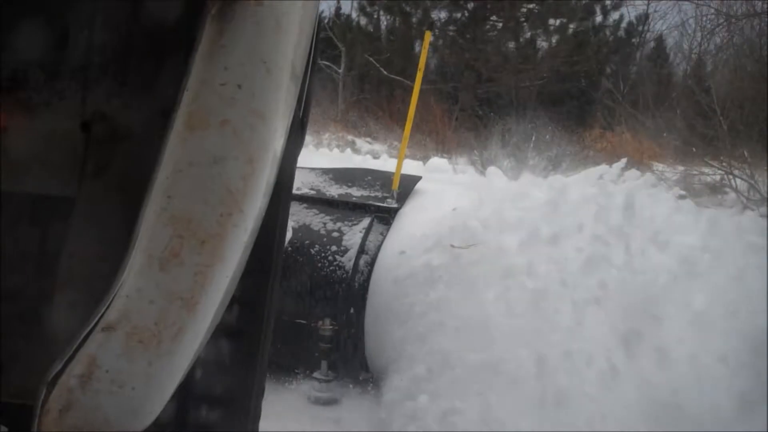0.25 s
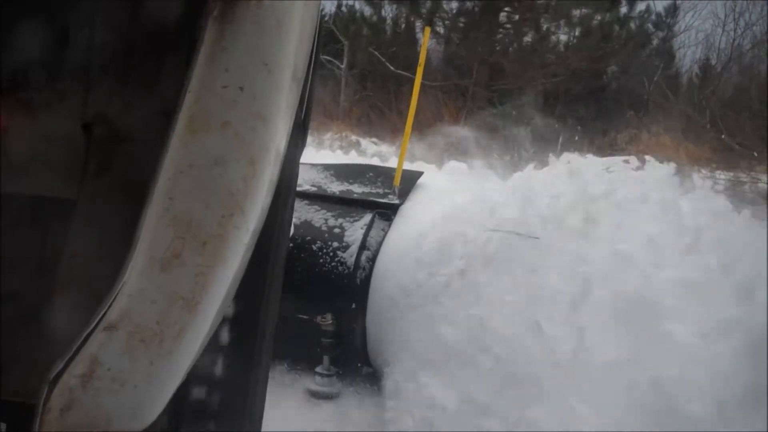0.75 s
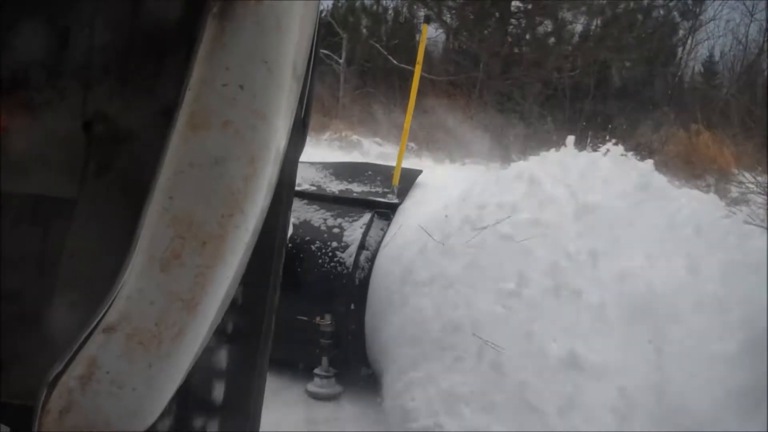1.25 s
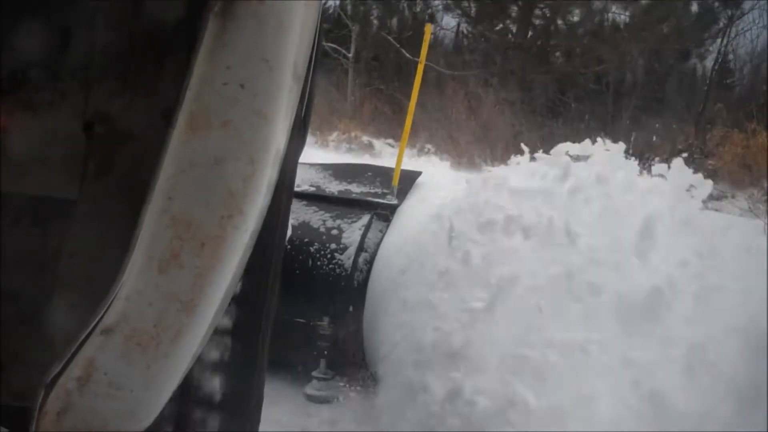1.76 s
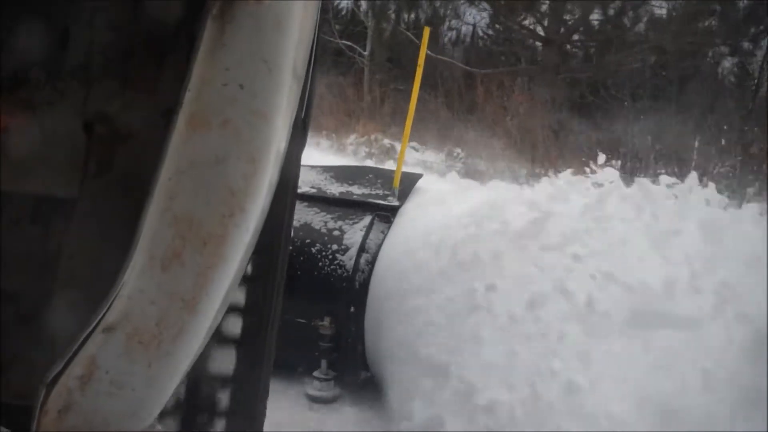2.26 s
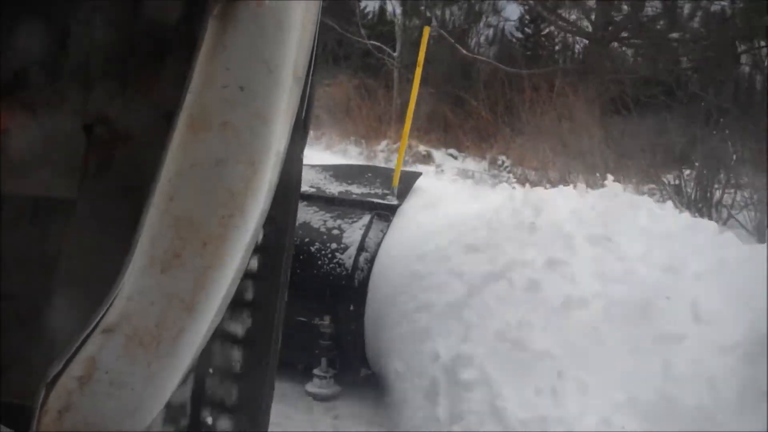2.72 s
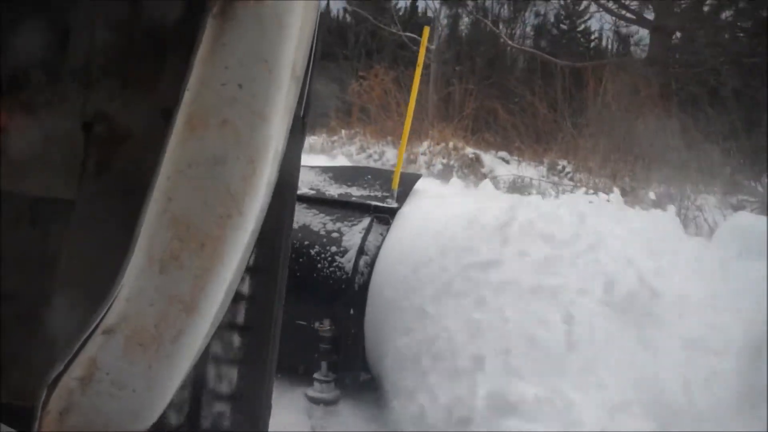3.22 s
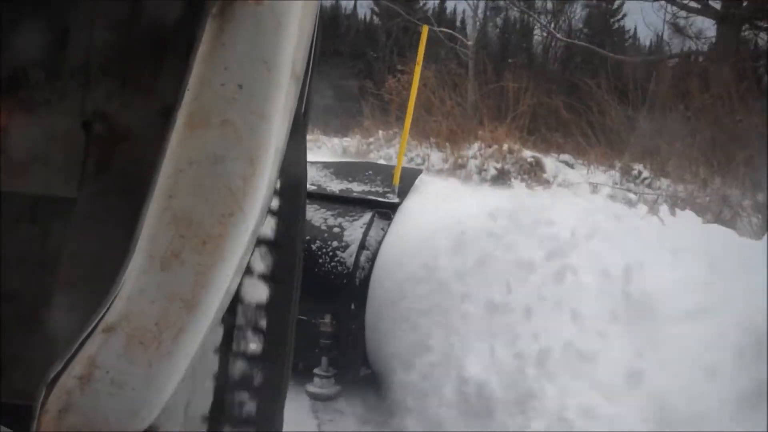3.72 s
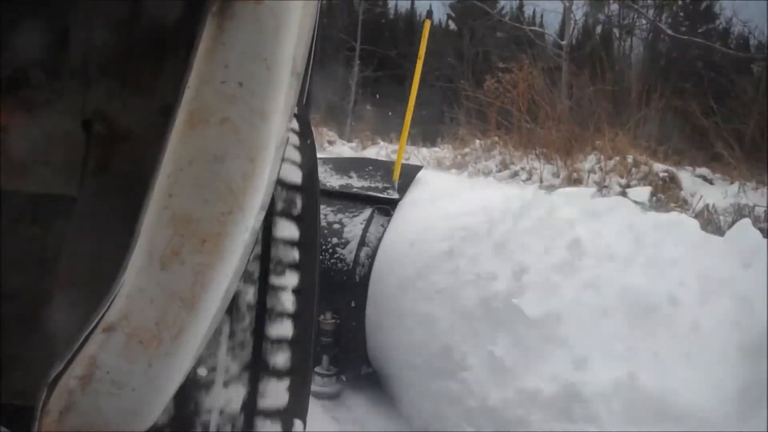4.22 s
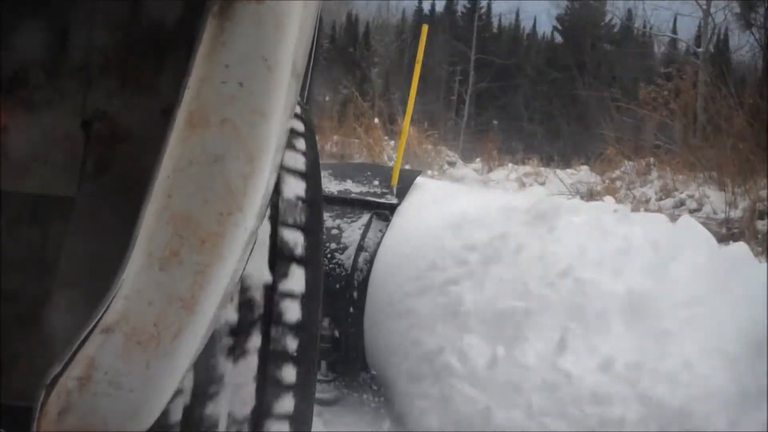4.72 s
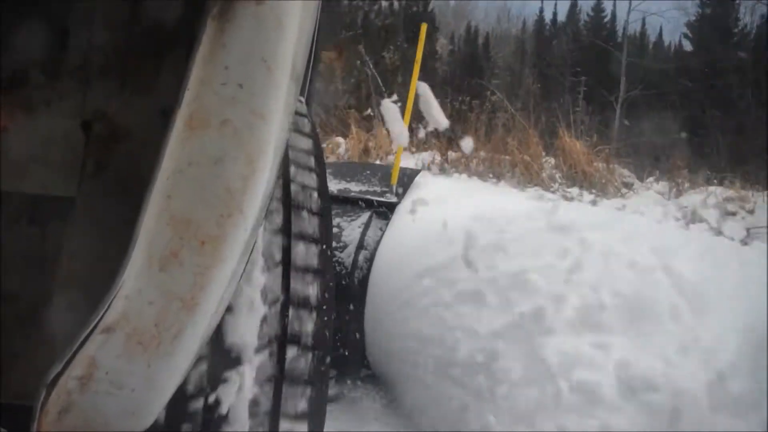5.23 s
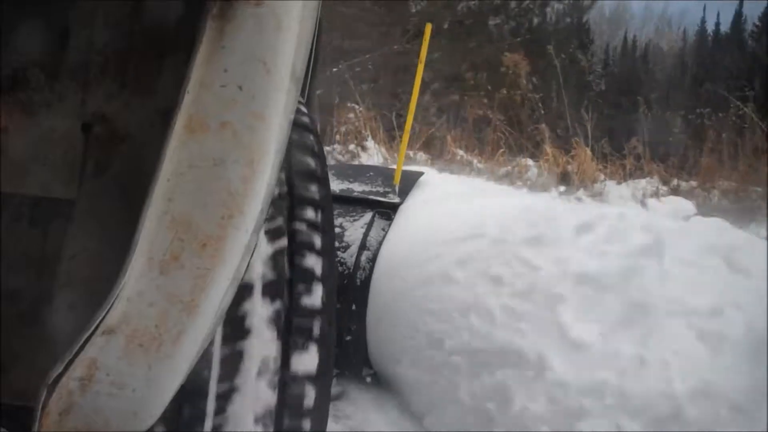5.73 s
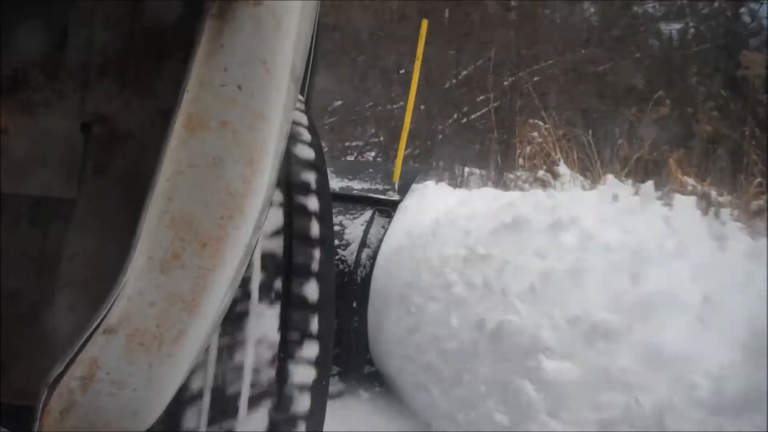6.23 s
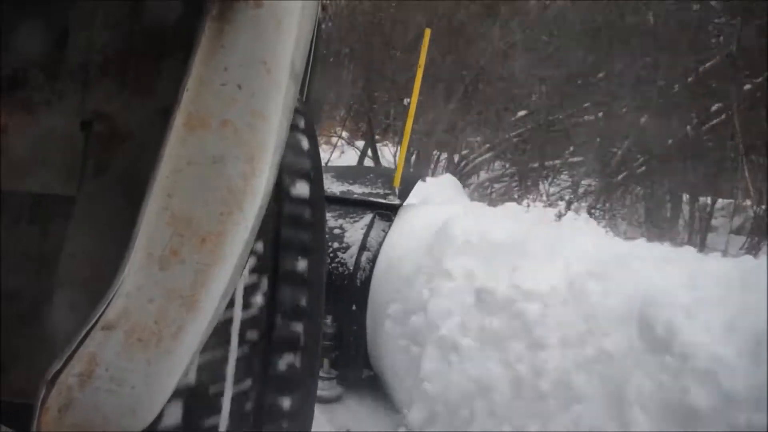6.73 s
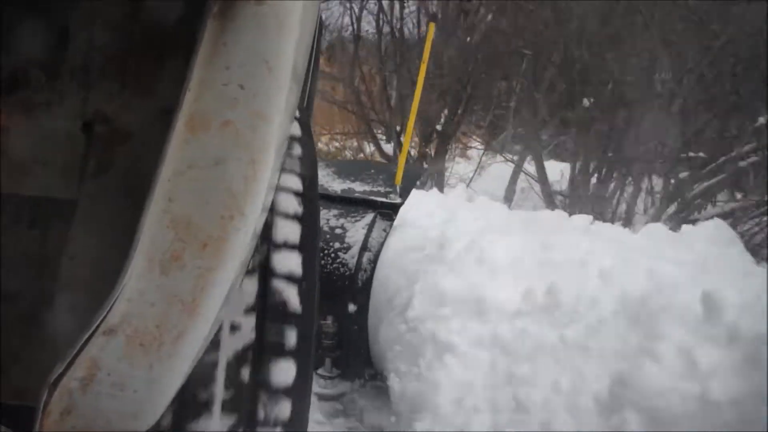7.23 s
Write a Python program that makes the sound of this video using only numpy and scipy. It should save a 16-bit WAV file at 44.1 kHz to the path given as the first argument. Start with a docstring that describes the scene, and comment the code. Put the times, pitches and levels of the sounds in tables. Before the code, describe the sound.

A small truck's steel plow blade scrapes, groans and booms over ice, with hard knocks, rattling pins, crunching snow and a low engine underneath.

```python
"""A snow plow's steel blade grinds and rasps over a frozen pond, pushed by a small truck, heard by its front wheel.
Grains of noise rung through the blade's resonances make it scrape, groan and boom; one tone sings briefly.
Blows on ice ridges ring the same blade; stick-slip bouts jolt the frame and rattle the linkage pins.
Noise bursts make slabs crunch and crust snap, and finer grains hiss as powder; the engine is a stack of
crank harmonics underneath, with a faint wavering whine and thin hiss behind."""
import sys
import numpy as np
from scipy import signal
from scipy.fft import rfft, irfft, next_fast_len
from scipy.io import wavfile

SR = 44100
rng = np.random.default_rng(int(sys.argv[2]) if len(sys.argv) > 2 else 0)


def transcribe(signal):
    """Save signal, clipped to [-1, 1], as a 16-bit WAV file at the path in sys.argv[1]."""
    frames = np.atleast_2d(signal).T
    limited = np.clip(frames, -1, 1)
    pcm = np.round(limited * 32767).astype(np.int16)
    wavfile.write(sys.argv[1], SR, pcm)


N = 329427
TIME = np.arange(N) / SR
TAPS = 8192  # samples in a filter design or a single blow
BINS = np.fft.rfftfreq(TAPS, 1 / SR)

# Levels in the tables are relative: a layer may trim them, and the ports shade each side.
# Weight of snow on the cutting edge: t/s, level/dB
LOAD = [(0.0, -17), (0.23, -20.5), (0.5, -20.5), (0.93, -23.5), (1.05, -22.5), (1.5, -23.5), (1.92, -24.5),
        (2.17, -25.5), (2.21, -24), (3.24, -24), (3.37, -25.5), (3.52, -21.5), (3.68, -29.5), (3.76, -29),
        (3.86, -22.5), (4.08, -23), (4.23, -29.5), (4.93, -24), (5.0, -26.5), (5.34, -24), (5.44, -25.5),
        (6.24, -29.5), (6.85, -24.5), (6.97, -20.5), (7.02, -23.5), (7.07, -23), (7.14, -22.5), (7.2, -24),
        (7.28, -23), (7.45, -26)]
# Boom of the blade: t/s, level/dB
BOOM_LEVEL = [(0.0, -18.5), (1.01, -23), (1.26, -24.5), (1.62, -22.5), (1.95, -22.5), (2.1, -21),
              (2.3, -20.5), (2.62, -19.5), (2.82, -21.5), (3.0, -21), (3.92, -18.5), (4.29, -28.5),
              (4.76, -28.5), (4.83, -23), (5.3, -21.5), (5.7, -25), (6.82, -27.5), (7.18, -22),
              (7.45, -25.5)]
# Snow sliding off the blade: t/s, level/dB
FLOW = [(0.0, -37.5), (0.27, -43.5), (0.37, -40), (1.54, -42), (1.96, -43.5), (2.23, -44.5), (3.46, -43.5),
        (3.84, -43), (4.06, -43.5), (4.26, -46), (4.69, -44.5), (6.56, -45), (7.12, -43), (7.45, -47.5)]
# The blade singing on one mode: t/s, mean f/Hz, level/dB
SINGING = [(0.5, 418, -50), (0.58, 417, -26.5), (0.75, 415, -31.5), (0.9, 418.6, -27), (0.96, 415, -28),
           (1.02, 420, -73)]
# Skids over bare ice: t/s, length/s, rasp level/dB, grit level/dB
SKIDS = [(0.141, 0.06, -41, -49), (0.632, 0.33, -42.5, -65), (1.003, 0.076, -44.5, -62),
         (2.244, 0.06, -43, -56), (2.258, 0.012, -49, -46), (2.321, 0.012, -37, -44.5),
         (2.377, 0.013, -47, -42.5), (2.864, 0.052, -41.5, -54), (3.522, 0.039, -41.5, -55),
         (4.052, 0.043, -41, -55), (5.386, 0.014, -49, -46), (7.062, 0.015, -43, -42.5),
         (7.172, 0.033, -35.5, -46.5), (7.294, 0.033, -39, -50.5)]
# Blows on ice ridges: t/s, boom level/dB, clang level/dB, crushing time/s, f of strongest clang/Hz
KNOCKS = [(0.069, -10.5, -12, 0.006, 660), (0.178, -11, -15.5, 0.011, 485), (0.357, -9.5, -19, 0.017, 427),
          (0.508, -24, -13.5, 0.03, 820), (0.631, -9.5, -21.5, 0.012, 425),
          (0.746, -11, -12.5, 0.0057, 409), (0.898, -27, -11.5, 0.0033, 530),
          (0.948, -3.5, -15.5, 0.019, 816), (1.418, -25, -10.5, 0.0038, 380),
          (1.459, -13, -17, 0.0024, 517), (1.48, -7, -9.5, 0.018, 810), (1.808, -13, -16, 0.0024, 396),
          (2.21, -12, -17.5, 0.008, 826), (2.245, -10, -10.5, 0.03, 387), (2.434, -9, -10.5, 0.0018, 410),
          (2.548, -9, -14.5, 0.0098, 412), (2.609, -27, -14.5, 0.06, 840), (2.664, -11, -15, 0.01, 860),
          (2.838, -13.5, -19.5, 0.0027, 560), (3.326, -18, -11.5, 0.012, 414), (3.358, -7, -15, 0.016, 394),
          (3.425, -13.5, -26.5, 0.01, 410), (3.467, -11.5, -12.5, 0.034, 396),
          (3.523, -13.5, -16.5, 0.0033, 547), (3.546, -38, -12.5, 0.004, 790),
          (3.713, -16, -11, 0.013, 413), (3.745, -9.5, -13.5, 0.02, 380), (3.823, -17, -12.5, 0.0047, 417),
          (3.853, -12.5, -15.5, 0.011, 426), (4.03, -11, -28, 0.043, 820), (4.367, -17, -20, 0.007, 634),
          (4.45, -18, -17.5, 0.069, 506), (4.865, -16, -12, 0.042, 377), (4.917, -14.5, -18, 0.015, 980),
          (5.12, -17, -17, 0.028, 885), (5.284, -36, -14, 0.023, 368), (5.362, -9, -21.5, 0.017, 795),
          (6.022, -15.5, -43, 0.013, 619), (6.056, -14, -19.5, 0.019, 930), (6.943, -14, -11, 0.0099, 900),
          (6.977, -23, -12.5, 0.015, 427), (7.058, -18.5, -12.5, 0.015, 884),
          (7.108, -17, -19.5, 0.0072, 470), (7.172, -13, -11, 0.025, 460), (7.195, -27, -18, 0.014, 860),
          (7.237, -10, -24.5, 0.015, 860), (7.325, -14, -17, 0.033, 590)]
# Stick-slip bouts: t of first slip/s, length/s, mean slip rate/Hz, mean shudder level/dB, mean rattle level/dB
BOUTS = [(0.11, 0.08, 32, -23.5, -40.5), (0.62, 0.07, 29, -36, -43), (1.015, 0.1, 33, -29.5, -38),
         (1.170, 0.16, 33, -24.5, -34.5), (1.354, 0.17, 32.4, -26.5, -38), (1.541, 0.2, 36, -29.5, -37.5),
         (2.327, 0.33, 30.9, -29, -39), (2.872, 0.13, 29, -27.5, -43), (3.05, 0.3, 30.6, -31, -38.5),
         (3.473, 0.074, 29, -32.5, -37), (3.998, 0.1, 32, -23.5, -37.5), (4.62, 0.1, 35, -34, -42),
         (5.161, 0.17, 30.5, -36, -41), (5.54, 0.04, 42, -37.5, -43), (5.62, 0.06, 33, -30, -53),
         (6.837, 0.11, 30, -33, -41), (6.967, 0.1, 32.4, -25, -34.5), (7.096, 0.1, 33, -35.5, -42),
         (7.313, 0.1, 32, -29.5, -36)]
# Linkage pins hitting home: t/s, tick level/dB, clack level/dB
CLACKS = [(0.187, -32, -29), (1.199, -35, -24), (1.291, -36, -31), (1.427, -35, -25), (1.725, -36, -23),
          (1.793, -34, -31), (2.632, -35, -26), (2.879, -24.5, -29), (3.276, -27, -33), (4.024, -28, -27),
          (4.06, -39, -42), (4.086, -28, -25), (4.15, -32, -33), (5.104, -38, -27), (5.246, -34, -34),
          (6.787, -43, -22), (7.14, -41, -25.5), (7.339, -27.5, -29)]
# Slabs of packed snow crunching on the blade: t/s, level/dB, decay/s
CRUNCHES = [(0.01, -26.5, 0.031), (0.068, -20.5, 0.017), (0.098, -19, 0.006), (0.167, -21.5, 0.018),
            (0.319, -26, 0.014), (0.416, -25, 0.03), (0.513, -22, 0.027), (1.17, -24.5, 0.011),
            (1.202, -23, 0.02), (1.263, -21, 0.015), (1.41, -26.5, 0.022), (1.478, -21.5, 0.014),
            (1.808, -23.5, 0.0081), (2.382, -24.5, 0.016), (2.546, -19.5, 0.0095), (2.914, -27, 0.022),
            (3.188, -26.5, 0.022), (3.965, -24, 0.013), (4.061, -24.5, 0.015), (4.691, -24, 0.012),
            (4.906, -27, 0.016), (5.271, -28, 0.012), (5.398, -26.5, 0.021), (6.049, -26, 0.013),
            (6.736, -26, 0.019), (6.968, -24, 0.014), (7.057, -27.5, 0.03), (7.193, -26.5, 0.039),
            (7.309, -25, 0.016)]
# Icy crust snapping: t/s, peak level/dB, decay/s, centre f/Hz
SNAPS = [(0.174, -33, 0.0029, 4500), (0.182, -32, 0.0047, 6000), (1.121, -28, 0.0025, 4600),
         (1.131, -28, 0.0018, 5600), (1.249, -37, 0.003, 7800), (1.273, -28, 0.003, 4300),
         (1.426, -27, 0.0023, 5500), (1.44, -33, 0.002, 7500), (1.489, -32, 0.004, 5800),
         (1.523, -32, 0.0017, 6200), (2.471, -31, 0.0027, 4500), (2.571, -31, 0.0025, 4800),
         (2.581, -32, 0.003, 7200), (2.631, -30, 0.0065, 4600), (2.71, -31.5, 0.003, 5400),
         (2.881, -31, 0.0037, 5500), (3.198, -29.5, 0.002, 4500), (3.203, -33, 0.0056, 7300),
         (3.277, -25.5, 0.0025, 5200), (4.041, -27.5, 0.0027, 6000), (4.915, -36, 0.005, 5500),
         (5.102, -27, 0.002, 3500), (6.788, -31, 0.002, 3400), (6.936, -29, 0.002, 3200),
         (6.993, -31, 0.004, 4000), (7.138, -33, 0.002, 3600), (7.339, -36, 0.0027, 4500),
         (7.4, -33, 0.0025, 3200)]
# Engine: t/s, mean crank rate/Hz, level/dB
ENGINE = [(0, 40.3, -23), (.35, 39.3, -27), (.65, 39.4, -21), (1, 39.2, -22.5), (1.5, 35.4, -27),
          (2.1, 33, -34), (3, 40.3, -36), (3.8, 32.8, -31), (4.3, 33.4, -45), (5.1, 43.6, -26),
          (5.9, 38.2, -35), (7.47, 46, -29.5)]
# Engine orders: multiple of crank rate, mean level/dB
ENGINE_ORDERS = [(2, -7), (2.5, -16.5), (3.5, -3), (4, 3.5), (4.5, 2.5), (5, -8.5), (5.5, -9), (6, -2.5),
                 (10.5, -7.5), (12, -13.5), (13, -16.5), (16, -14.5)]
# Faint high whine tones, wavering in pitch: mean f/Hz, level/dB
WHINE = [(5036, -74), (7868, -74), (11808, -80)]

# Resonances of the frame and of the blade's boom, groan and scrape: f/Hz, width/Hz, level/dB
FRAME_MODES = [(76.2, 11, 0.5), (94.5, 9, -1), (128.9, 13.7, 2.5)]
BOOM_MODES = [(160.4, 16, -3), (178.9, 11, 6.5), (200.2, 19, -1.5), (231.6, 22.2, 0)]
GROAN_MODES = [(310, 26, -3.5), (387, 24, -1), (412, 20, -2), (465, 24, -6), (516, 42, -3.5), (590, 54, -8),
               (633, 32, -4)]
SCRAPE_MODES = [(785, 48, -2.5), (831, 75, 4), (873, 87, -11), (1050, 46, -6.5), (1151, 92, -4.5),
                (1364, 44, -15.5), (1374, 19, -9), (1552, 51, -14.5), (1700, 35, -16)]
# Smooth spectra of the frame and of the blade's boom, groan and scrape: f/Hz, level/dB
FRAME_BAND = [(10, -53.5), (22, -18.5), (30, -4), (45, 7.5), (62, -4.5), (80, -0.5), (135, -3.5),
              (190, -26), (400, -60.5)]
BOOM_BAND = [(50, -25.5), (120, -10), (155, -4), (250, -3), (290, -6.5), (450, -12.5), (1200, -61)]
GROAN_BAND = [(100, -53.5), (260, -12), (330, -4), (650, -2.5), (735, 0.5), (1000, -13), (2000, -19),
              (6000, -64.5)]
SCRAPE_BAND = [(200, -44), (600, -12), (830, -2), (970, -2.5), (1150, -1), (1720, 3), (1850, -2.5),
               (2350, 4.5), (2800, -5.5), (4200, -17), (9000, -53)]
# Spectra of the rasping edge and of sprayed grit: f/Hz, level/dB
RASP_BAND = [(1000, -34.5), (1800, -14), (2050, 5.5), (2350, -1), (2600, -4), (3000, -5.5), (4200, -24),
             (9000, -44.5)]
GRIT_BAND = [(1200, -23), (2500, -0.5), (4000, 2), (5800, 3.5), (7200, 1.5), (9000, -15), (14000, -30.5)]
# Spectra of a pin's tick, its clack, and its ping at a slip: f/Hz, level/dB
TICK_BAND = [(1500, -22), (3500, -3.5), (4500, -7), (5800, -11), (6400, 3.5), (6850, -7), (7250, 2),
             (7900, -7), (8800, -18), (10000, -31.5), (14000, -28.5)]
CLACK_BAND = [(500, -29), (1500, 12), (2500, 3), (3100, -1), (3700, 1.5), (4200, -13.5), (5500, -16.5),
              (8000, -35), (14000, -44)]
PIN_BAND = [(2500, -38), (5400, -23), (5950, -12), (6250, 0), (6550, 0), (6850, -5), (7200, -16),
            (8000, -24), (10000, -42), (14000, -48)]
# Spectra of crunching slabs, snapping crust and hissing powder: f/Hz, level/dB
CRUNCH_BAND = [(300, -44.5), (800, -15), (1100, 4.5), (1400, 0.5), (1720, 4.5), (1900, 1), (2400, 2),
               (3500, -1.5), (8000, -28.5)]
SNAP_BAND = [(1500, -10.5), (3400, 7.5), (4500, -2.5), (6000, 4.5), (7500, 0), (8700, -4.5), (10000, -13),
             (14000, -26)]
SNOW_BAND = [(600, -39), (1800, 5), (2300, 2.5), (2800, 4), (3550, 3), (4100, -6), (5700, -6.5), (6400, -4),
             (7400, -13.5), (8200, -14.5), (9500, -20), (11000, -24.5), (14000, -26.5)]

# How alike the two microphone ports hear: f/Hz, likeness from 0 to 1
LIKENESS = [(60, .99), (550, .99), (850, .96), (1200, .89), (1600, .8), (1850, .2), (2300, .35),
            (2700, .76), (3300, .84), (3750, .66), (4200, .25), (6400, .38), (8500, .08)]
# Lead of the left port: f/Hz, phase/rad
LEAD = [(60, 0), (700, 0), (850, -.3), (1800, -.2), (1950, 1.8), (2670, 2.6), (3700, 2.8), (4400, 6.5),
        (5200, 6.5), (6200, 10.6), (7000, 12), (7840, 14.2), (14000, 13)]
# Left minus right: f/Hz, level/dB
TILT = [(60, -2.3), (280, -2.6), (420, -1.9), (620, -2.3), (830, -4.6), (1380, -1.5), (2100, -3.8),
        (2900, -3.8), (3350, 0), (3900, 0), (4200, -3), (5900, -5), (6350, -10), (7000, 2), (7700, 6),
        (9000, 4), (12000, 1)]

BOUT_RISE_S, BOUT_FALL_S = 0.015, 0.01  # a bout builds before its first slip and fades at its end
ROCK_HZ = 31  # mean rate at which the blade rocks on its mount
SKIP_S, SKIP_WIDTH_S, SKIP_DB = 0.22, 0.053, -5.5  # thrown up by the first bout, the edge briefly loses bite
REBOUND_S, REBOUND_SPREAD_S, REBOUND_DB = 0.006, 0.013, -9.5  # a weaker pin bounce after each slip
CEILING, EDGE_HZ = 0.93, 14300  # soft limit of the peaks (full scale 1) and top of the band


def plow(boom, groan, scrape, load, flow, grip, pulsing):
    """Ice fractures under the edge ring the blade: boom on its own curve, groan by load, scrape by load and flow."""
    lumps_db, throb = 0.9, 0.25
    groan_db, scrape_db, scrape_grip_db = -2.5, -7.0, 0.5
    usual = np.median(load)
    rubbing = usual * (load / usual) ** 0.51 * (flow / np.median(flow)) ** 0.4
    # lumps of snow and slips load groan and scrape together
    lumps = gain_of(lumps_db * wander(5.5)) * (1 + throb * pulsing)

    boom_grains = grinding(770, 0.71, 0.0028, 0.71)
    booming = evened(detuned(ring(boom_grains, boom), 0.01601, 4.03)) * gain_of(curves(BOOM_LEVEL))

    groan_grains = grinding(870, 4.6, 0.0027, 0.95)
    groaning = evened(detuned(ring(groan_grains, groan), 0.01484, 4.9)) * lumps * load

    scrape_grains = grinding(1000, 1.3, 0.0011, 0.51) * lumps
    scraping = evened(ring(scrape_grains, scrape)) * rubbing
    scrape_gain = gain_of(scrape_db + scrape_grip_db * grip)
    return booming + gain_of(groan_db) * groaning + scrape_gain * scraping


def singing(waver=0.0035, uneven_db=0.5, octave_db=-13):
    """The dragging edge locks on to one mode of the blade: a clean, slightly wavering tone with its octave."""
    hz, db = curves(SINGING)
    angle = 2 * np.pi * np.cumsum(hz * (1 + waver * wander(22))) / SR
    tone = np.sin(angle) + gain_of(octave_db) * np.sin(2 * angle)
    return np.sqrt(2) * gain_of(db + uneven_db * wander(12)) * tone


def skids(rise_s=0.0042, fall_s=0.011):
    """On bare ice the edge rasps in coarse grains and sprays finer grit."""
    rasp_level, grit_level = np.zeros(N), np.zeros(N)
    for s, length, rasp_db, grit_db in SKIDS:
        full = s + rise_s
        corners = [s, full, full + length, full + length + fall_s]
        held = np.interp(TIME, corners, [0.015, 0.89, 0.52, 0])
        rasp_level += gain_of(rasp_db) * held
        grit_level += gain_of(grit_db) * held
    rasp = evened(ring(grinding(600, 2.7, 0.00098, 0.2), response(RASP_BAND)))
    grit = evened(ring(grinding(900, 4.1, 0.00052, 0.15), response(GRIT_BAND)))
    return rasp_level * rasp + grit_level * grit


def knocks(boom, sheet, focus=5.5, rise_s=0.004):
    """The edge strikes ridges: the whole blade booms, and the place of the blow picks the modes that clang."""
    out = np.zeros((2, N))
    for s, boom_db, clang_db, crush_s, hz in KNOCKS:
        struck = signal.lfilter(*signal.iirpeak(hz, focus, SR), sheet)
        add(out, s, gain_of(boom_db) * blow(boom, 0.003, 0.068))
        add(out, s, gain_of(clang_db) * blow(struck, crush_s, 0.22, rise_s))
    return out


def chatter(jitter_s=0.0012, uneven_db=2.0):
    """Stick-slip bouts give the slips (t/s, shudder/dB, rattle/dB), how firmly the edge grips, and the throb."""
    slips, grip, pulsing = [], np.zeros(N), np.zeros(N)
    for start, length, slip_hz, shudder_db, rattle_db in BOUTS:
        for s in np.arange(start, start + length, 1 / slip_hz):
            late, harder, sharper = rng.standard_normal(3)
            slips.append((s + jitter_s * late, shudder_db + uneven_db * harder, rattle_db + uneven_db * sharper))
        end = start + length
        held = np.interp(TIME, [start - BOUT_RISE_S, start, end, end + BOUT_FALL_S], [0, 1, 1, 0])
        strength = gain_of(shudder_db) * held
        grip += strength
        pulsing += strength * np.cos(2 * np.pi * slip_hz * (TIME - start))
    return slips, grip / grip.max(), pulsing / grip.max()


def shudder(frame, slips, load, grip):
    """The frame rumbles under the load and takes a jolt from every slip; the blade rocks on its mount."""
    rumble_db, judder_db, sway_db, rock_db = -10, -33, -45, -42
    jolts = np.zeros((1, N))
    for s, db, _ in slips:
        add(jolts, s, gain_of([db]))
    # unit-energy jolts, scaled to rms 1 when repeated at the rocking rate
    jolted = ring(jolts, frame / np.linalg.norm(frame)) * np.sqrt(SR / ROCK_HZ)

    carried = np.sqrt(load * np.median(load))  # the springs soften the swings of the load
    rumble_level = np.hypot(gain_of(rumble_db) * carried, gain_of(judder_db) * grip)
    rumble = rumble_level * evened(ring(rng.standard_normal((2, N)), frame))

    turns = np.cumsum(ROCK_HZ * (1 + 0.018 * wander(14))) / SR
    sway_level = gain_of(sway_db + 1.5 * wander(5.4)) + gain_of(rock_db) * grip
    return jolted + rumble + sway_level * np.sin(2 * np.pi * turns)


def rattle(slips, slip_tick_db=1.0, slip_clack_db=8.0, ping_s=0.00088):
    """Loose linkage pins ring briefly at every slip and bounce; now and then they clack hard in their holes."""
    out = np.zeros((2, N))
    tick, clack, pin = response(TICK_BAND), response(CLACK_BAND), response(PIN_BAND)
    for s, tick_db, clack_db in CLACKS:
        add(out, s, gain_of(tick_db) * blow(tick, 0.0018, 0.95))
        add(out, s, gain_of(clack_db) * blow(clack, 0.005, 0.6))
    for s, _, db in slips:
        add(out, s, gain_of(db + slip_tick_db) * blow(pin, ping_s, 0.36))
        add(out, s, gain_of(db + slip_clack_db) * blow(clack, 0.0019, 0.55))
        bounce = s + REBOUND_S + REBOUND_SPREAD_S * rng.random()
        add(out, bounce, gain_of(db + REBOUND_DB) * blow(tick, ping_s, 0.5))
    return out


def crunches(crunch_db=-1.45, rise_s=0.0029, clump_db=1.5, clump_s=0.0011):
    """Each slab of packed snow gives way in a short clump of fractures that rings the face of the blade."""
    out, face, t = np.zeros((2, N)), response(CRUNCH_BAND, SCRAPE_MODES), np.arange(TAPS) / SR
    for s, db, length in CRUNCHES:
        sizes = np.clip(rng.standard_normal(TAPS), -2, 2)
        clumps = np.interp(t, np.arange(TAPS) * clump_s, sizes)
        swell = np.minimum(t / rise_s, 1) * np.exp(-(t / length) ** 2)
        sound = ring(swell * gain_of(clump_db * clumps) * rng.standard_normal((2, TAPS)), face)
        sound *= np.linalg.norm(swell) / np.linalg.norm(sound, axis=1, keepdims=True)  # the swell sets the energy
        add(out, s, gain_of(db + crunch_db) * sound)
    return out


def snaps(grip, focus=1.4, count=130):
    """Icy crust snaps, each piece at its own pitch; smaller splinters break at random, likelier in a chatter."""
    stray_db, stray_spread_db, stray_s = -46, 9, 0.0012
    low_hz, high_hz = 3200, 8200
    out, crust = np.zeros((2, N)), response(SNAP_BAND)
    odds = np.cumsum(grip + 0.06)
    splinters = []
    for when, size, pitch in rng.random((count, 3)):
        s = np.interp(when, odds / odds[-1], TIME)
        splinters.append((s, stray_db + stray_spread_db * size ** 2, stray_s, low_hz + (high_hz - low_hz) * pitch))
    for s, db, length, hz in SNAPS + splinters:
        piece = signal.lfilter(*signal.iirpeak(hz, focus, SR), crust)
        add(out, s, gain_of(db) * blow(piece, length, 0.91))
    return out


def snow(grip, pulsing, hiss_db=-1.5, throb=0.12, grip_db=1.5):
    """Powder hisses off the blade as very short grains, harder where the edge catches."""
    grains = grinding(900, 3.1, 0.00062, 1.5) * (1 + throb * pulsing)
    return gain_of(hiss_db + grip_db * grip) * evened(ring(grains, response(SNOW_BAND)))


def engine(level_db=-1, uneven_db=2):
    """Eight cylinders fire four times a turn; their unevenness fills in the half orders."""
    crank_hz, db = curves(ENGINE)
    turns = np.cumsum(crank_hz * (1 + 0.002 * wander(6))) / SR
    tone = 0
    for order, order_db in ENGINE_ORDERS:
        level = gain_of(order_db + uneven_db * wander(5))
        tone = tone + level * np.cos(2 * np.pi * (order * turns + rng.random()))
    return gain_of(db + level_db) * evened(tone)


def whine(waver_hz=11, air_db=-70):
    """Faint high sine tones that waver in pitch, over a thin even hiss."""
    tones = np.zeros(N)
    for hz, db in WHINE:
        cycles = np.cumsum(hz + waver_hz * wander(40)) / SR
        tones += gain_of(db) * np.sqrt(2) * np.sin(2 * np.pi * cycles)
    return tones + gain_of(air_db) * rng.standard_normal((2, N))


def grinding(per_s, spread_db, grain_s, smooth):
    """Countless small fractures of uneven size, each a short puff of noise, over smooth sliding."""
    bigness = np.minimum(rng.exponential(1, N), 3)
    size = gain_of(spread_db * bigness) * (rng.random(N) < per_s / SR)
    power = signal.lfilter([1], [1, -np.exp(-1 / (grain_s * SR))], size ** 2)
    return np.sqrt(smooth + power / power.mean()) * rng.standard_normal((2, N))


def blow(body, contact_s, crush, rise_s=0):
    """A push and a decaying burst of crushing noise ring a body; peak 1. A rise time swells the crushing in."""
    t = np.arange(TAPS) / SR
    rise = np.minimum((t + 1 / SR) / (rise_s + 1 / SR), 1)
    drive = crush * np.exp(-t / contact_s) * rise * rng.standard_normal((2, TAPS))
    drive[:, 0] += 1
    sound = ring(drive, body)
    return sound / abs(sound).max(1, keepdims=True)


def detuned(pair, share, rate):
    """Snow heaping up and sliding off shifts the blade's resonances a little: a wavering playback speed."""
    when = np.cumsum(1 + share * wander(rate)) / SR
    return np.array([np.interp(when, TIME, x, period=TIME[-1]) for x in pair])


def response(band, modes=()):
    """Causal, minimum-phase impulse response of a smooth spectrum times a set of resonances."""
    gain = gain_of(read(band, BINS))
    if len(modes):
        power = sum(gain_of(db) ** 2 / (1 + (2 * (BINS - hz) / width) ** 2) for hz, width, db in modes)
        gain = gain * np.sqrt(power)
    log_gain = np.log(gain + 1e-6)
    circle = np.concatenate([log_gain, log_gain[-2:0:-1]])
    spectrum = np.exp(np.conj(signal.hilbert(circle)))  # the log gain's Hilbert transform gives the phase
    return np.fft.ifft(spectrum).real[:TAPS // 2]


def ring(drive, body):
    """Passes drive signals through a resonant body by convolution."""
    return signal.oaconvolve(drive, body[None], axes=1)[:, :N]


def wander(rate):
    """Slow random drift of rms 1, its spectrum rolling off around the given rate in Hz."""
    hz = np.fft.rfftfreq(N, 1 / SR)[:N // 32]
    noise = rfft(rng.standard_normal(2 * len(hz)))[:len(hz)]
    slow = irfft(noise * np.exp(-(hz / rate) ** 2))
    return evened(np.interp(TIME, np.linspace(0, TIME[-1], len(slow)), slow))


def gain_of(db):
    """Decibels to gain."""
    return 10 ** (np.asarray(db) / 20)


def evened(x):
    """Scales to rms 1."""
    return x / np.sqrt(np.mean(x ** 2) + 1e-20)


def read(points, hz):
    """Reads a spectrum table on a log-frequency axis."""
    f, value = np.transpose(points)
    return np.interp(np.log(hz + 1), np.log(f + 1), value)


def curves(rows):
    """Each column of a time table, sample by sample."""
    s, *columns = np.transpose(rows)
    return [np.interp(TIME, s, c) for c in columns]


def add(mix, s, sound):
    """Adds a sound at time s in seconds."""
    part = mix[:, max(round(s * SR), 0):][:, :sound.shape[-1]]
    part += sound[..., :part.shape[-1]]


def ports(pair):
    """Both ports hear the same bass; the treble reaches them shifted, shaded and partly scattered."""
    size = next_fast_len(N + TAPS)
    hz = np.fft.rfftfreq(size, 1 / SR)
    direct, scattered = rfft(pair, size)
    same = np.clip(read(LIKENESS, hz), 0, 1)
    right = (same * direct + np.sqrt(1 - same ** 2) * scattered) * np.exp(-1j * read(LEAD, hz))
    lean = gain_of(read(TILT, hz))
    balance = np.sqrt(2 / (1 + lean ** 2))  # keeps the summed power of both sides
    return irfft(np.array([direct * lean, right]) * balance, size)[:, :N]


def scene():
    """Plow, shuddering frame, knocks, sliding and breaking snow, rattle and engine at the two ports, plus whine."""
    frame, boom = response(FRAME_BAND, FRAME_MODES), response(BOOM_BAND, BOOM_MODES)
    groan, scrape = response(GROAN_BAND, GROAN_MODES), response(SCRAPE_BAND, SCRAPE_MODES)
    load, flow = gain_of(curves(LOAD)), gain_of(curves(FLOW))
    bite = gain_of(SKIP_DB * np.exp(-((TIME - SKIP_S) / SKIP_WIDTH_S) ** 2))
    slips, grip, pulsing = chatter()
    pushing = bite * (plow(boom, groan, scrape, load, flow, grip, pulsing) + flow * snow(grip, pulsing))
    steel = shudder(frame, slips, load, grip) + knocks(boom, groan + scrape) + rattle(slips) + singing()
    breaking = crunches() + snaps(grip) + skids()
    soft_ends = signal.windows.tukey(N, 0.001)
    return ports(soft_ends * (pushing + steel + breaking + engine())) + whine()


def record(dry):
    """Rounds off the very highest peaks, then limits the band with a low-pass."""
    rounded = dry / (1 + (dry / CEILING) ** 8) ** (1 / 8)
    low_pass = signal.firwin(511, EDGE_HZ, window=("kaiser", 9), fs=SR)
    return signal.oaconvolve(rounded, low_pass[None], "same")


dry = scene()
out = record(dry)
transcribe(out)
```